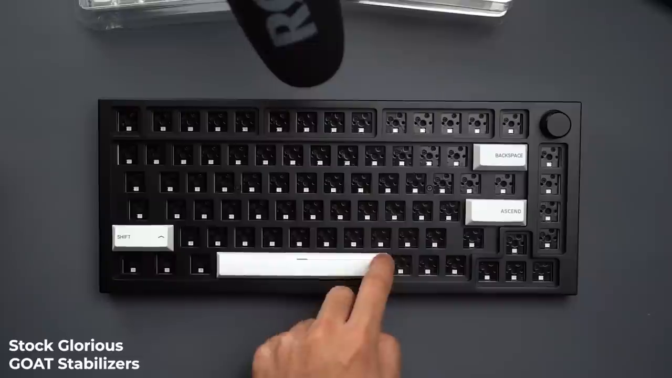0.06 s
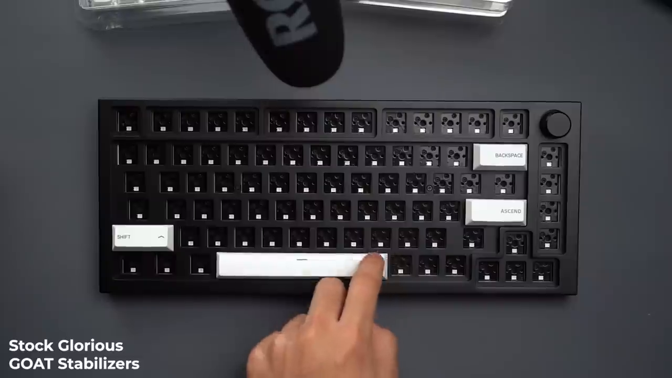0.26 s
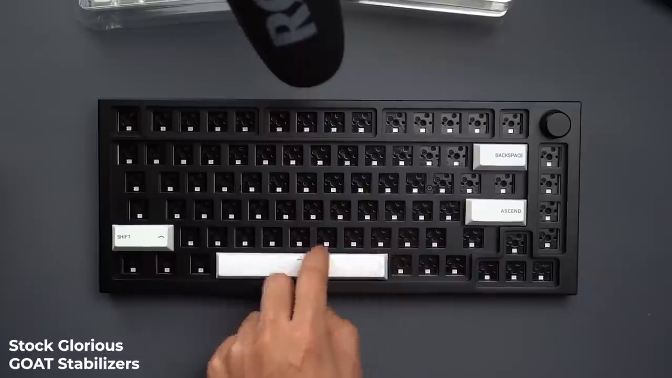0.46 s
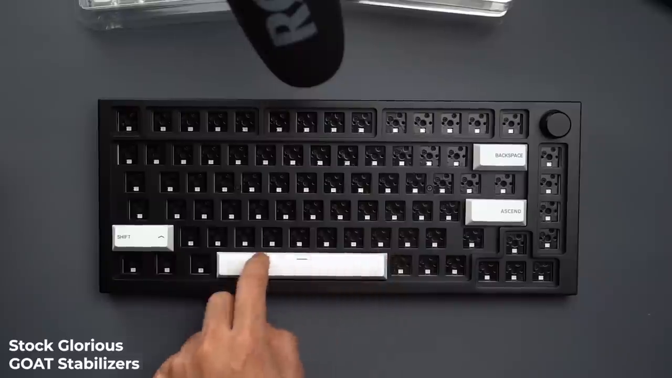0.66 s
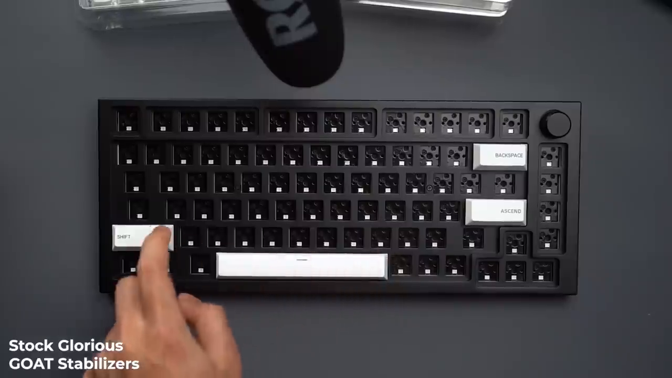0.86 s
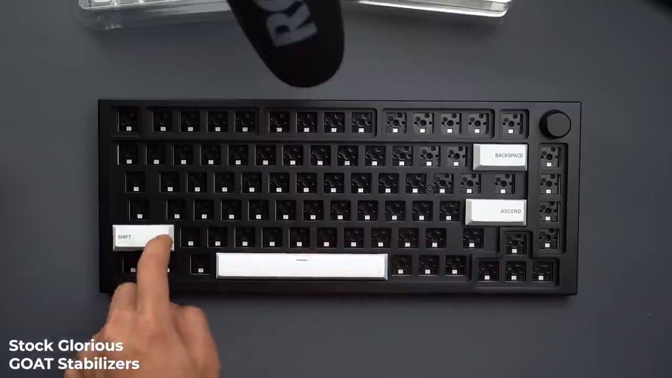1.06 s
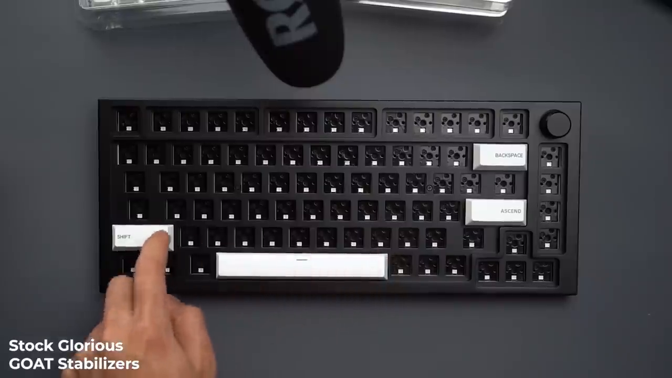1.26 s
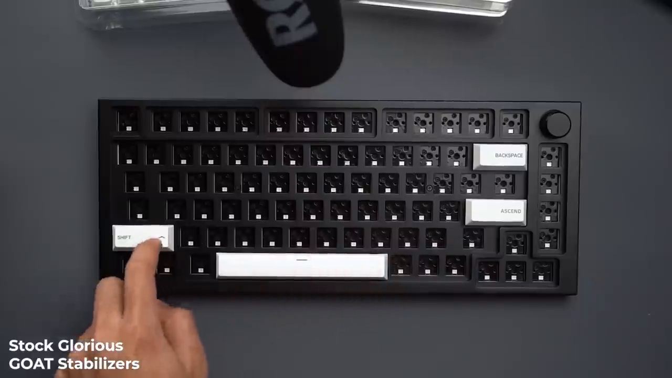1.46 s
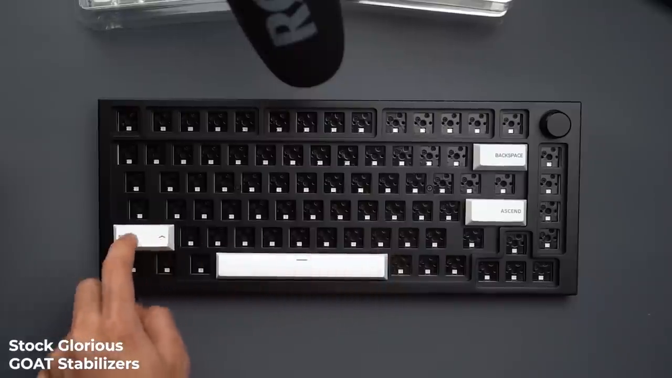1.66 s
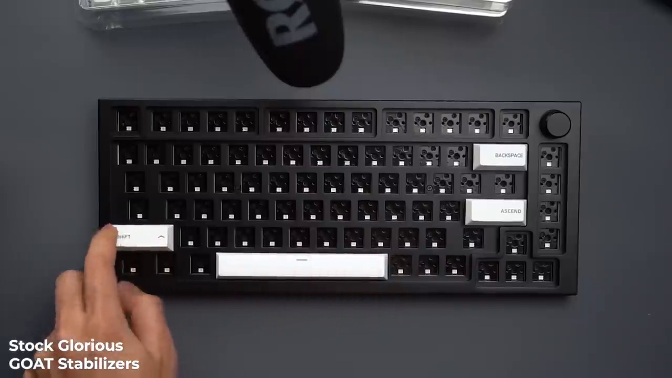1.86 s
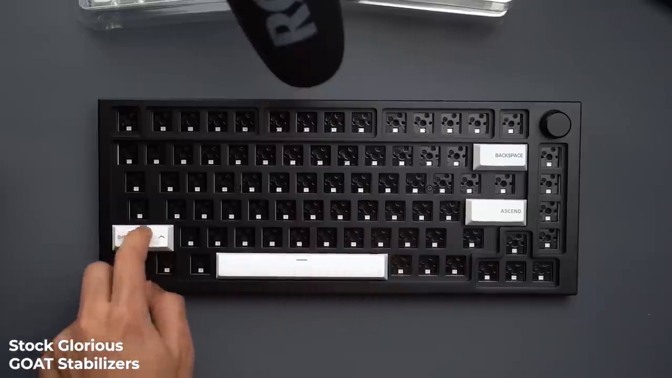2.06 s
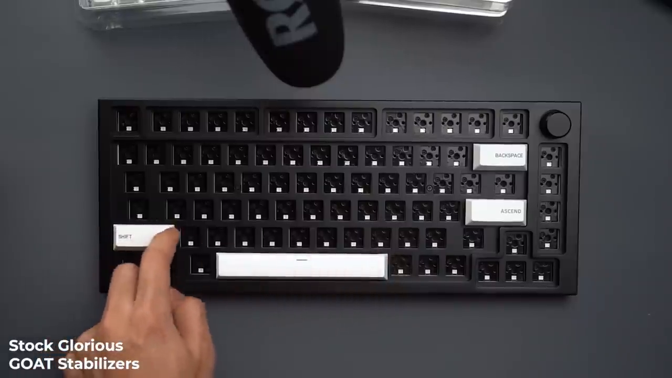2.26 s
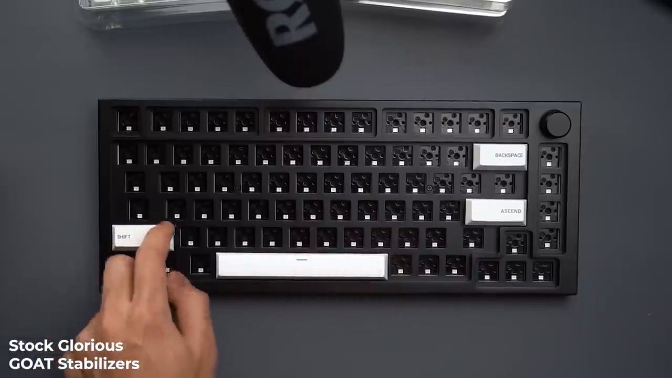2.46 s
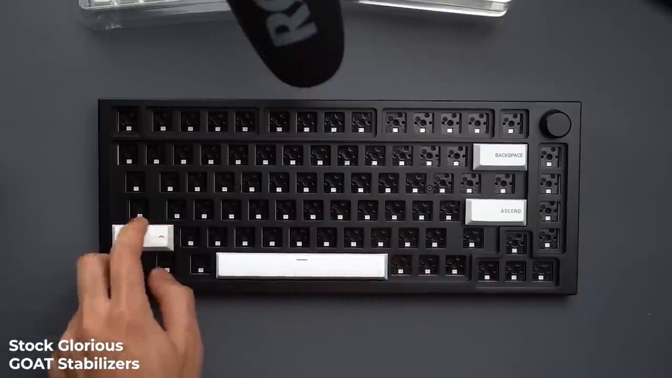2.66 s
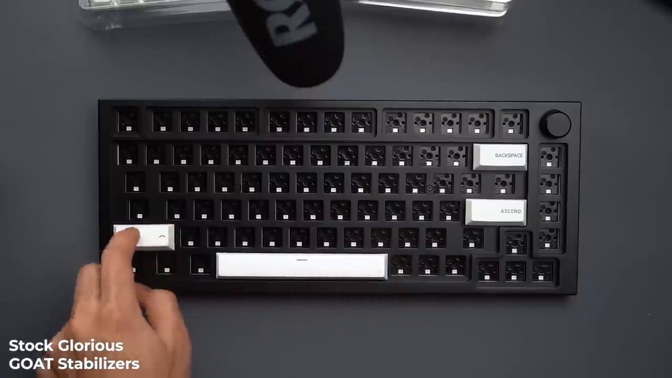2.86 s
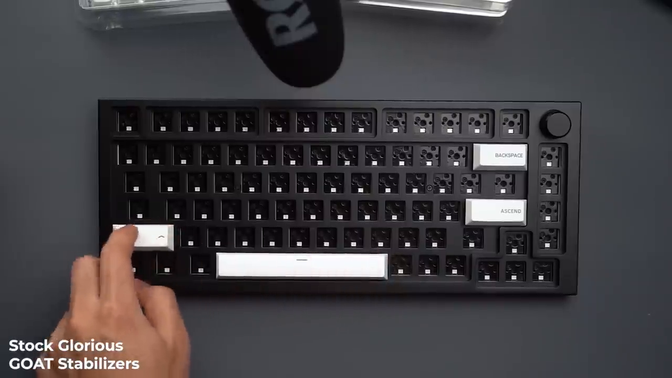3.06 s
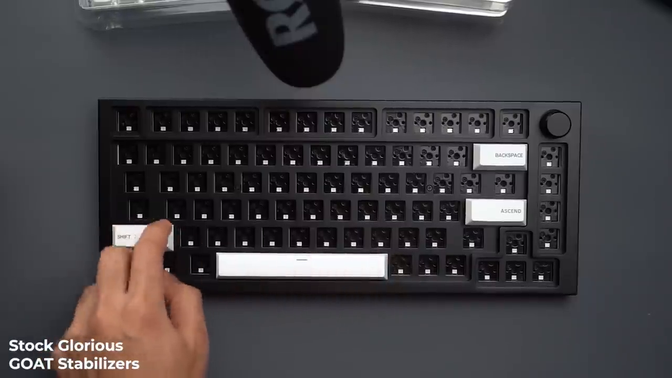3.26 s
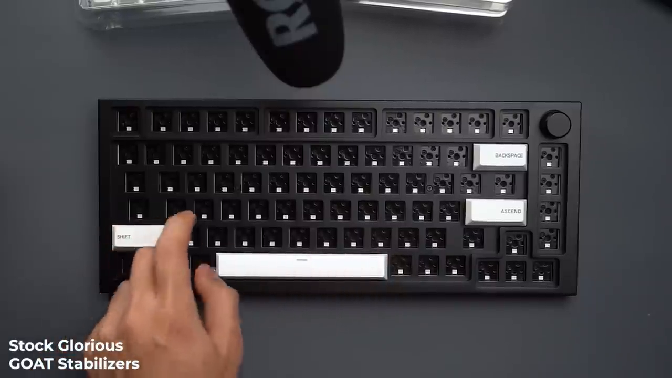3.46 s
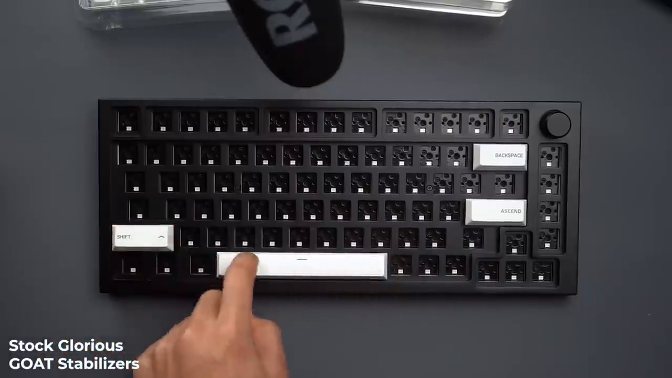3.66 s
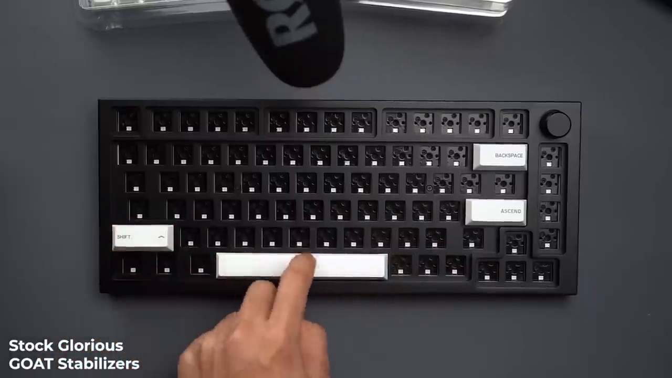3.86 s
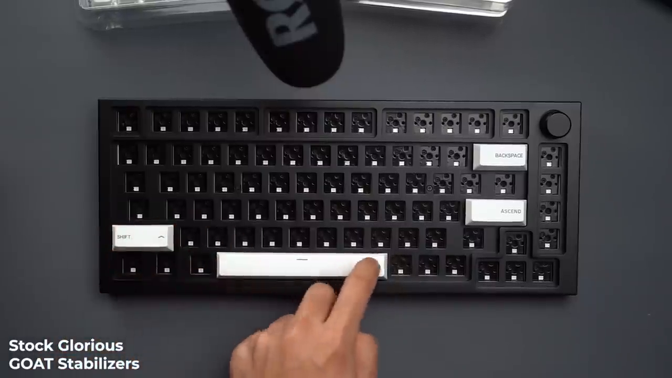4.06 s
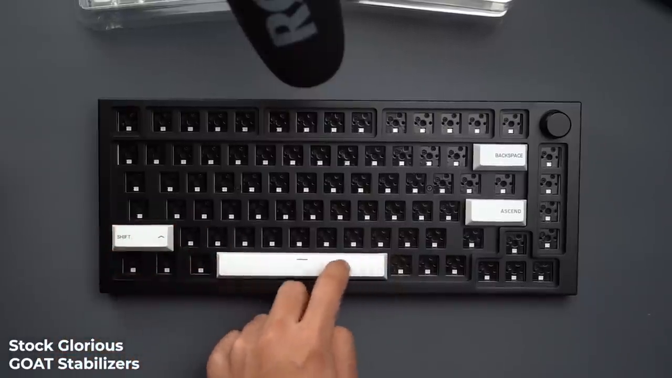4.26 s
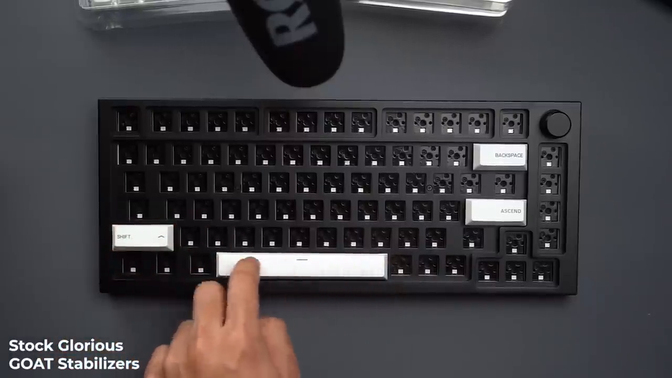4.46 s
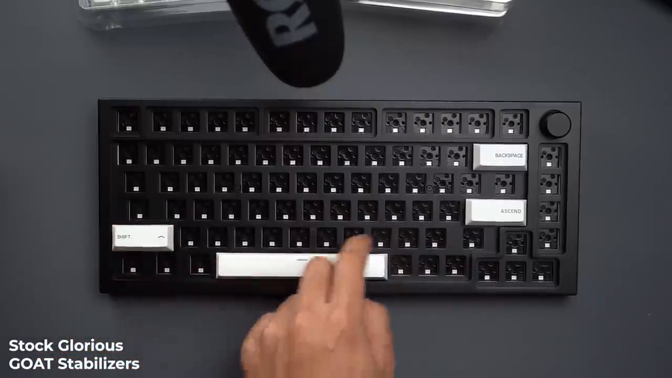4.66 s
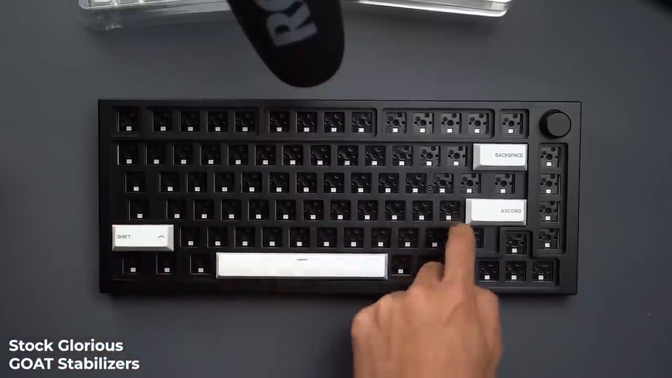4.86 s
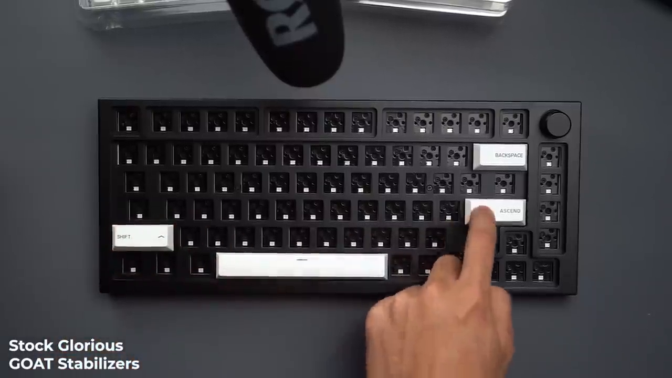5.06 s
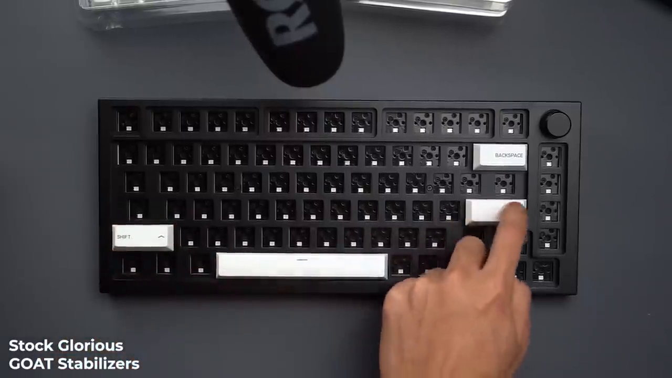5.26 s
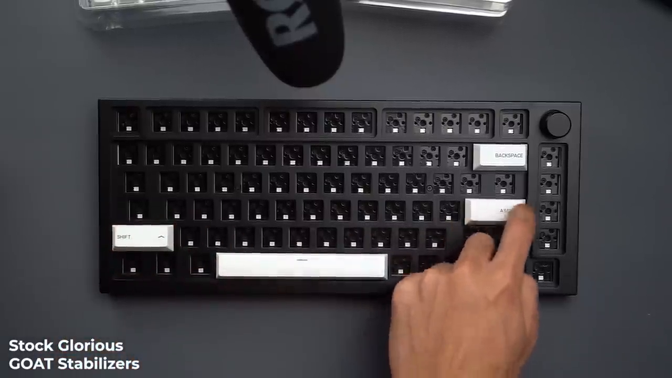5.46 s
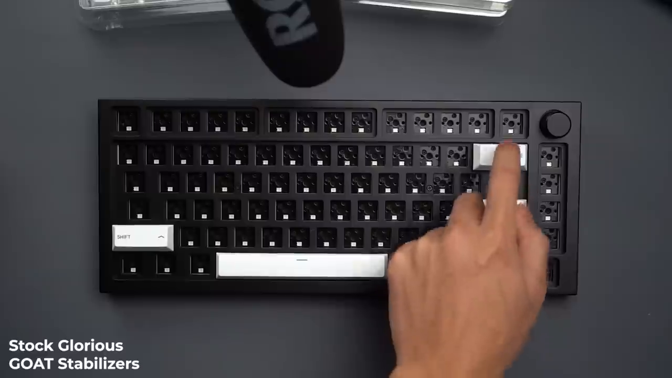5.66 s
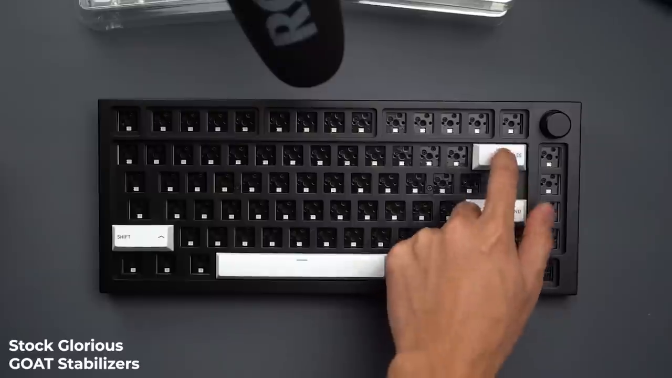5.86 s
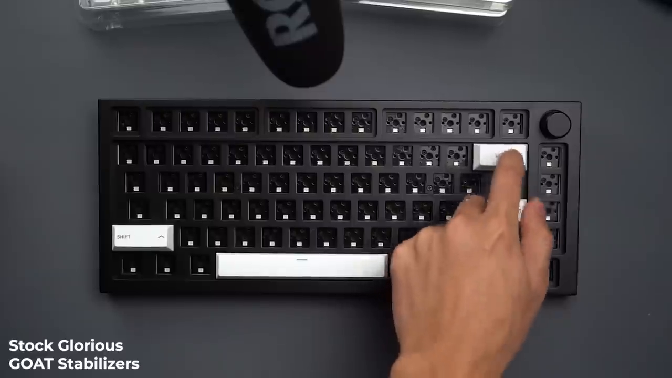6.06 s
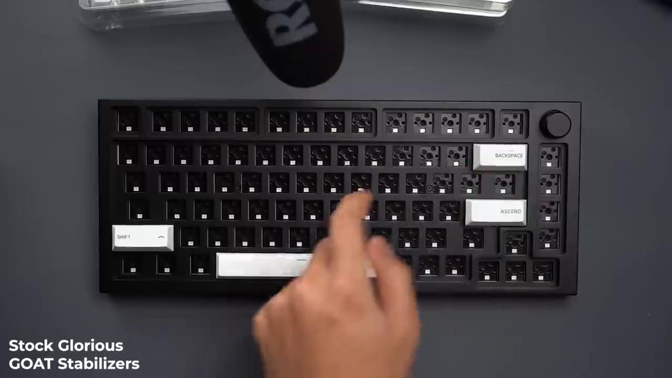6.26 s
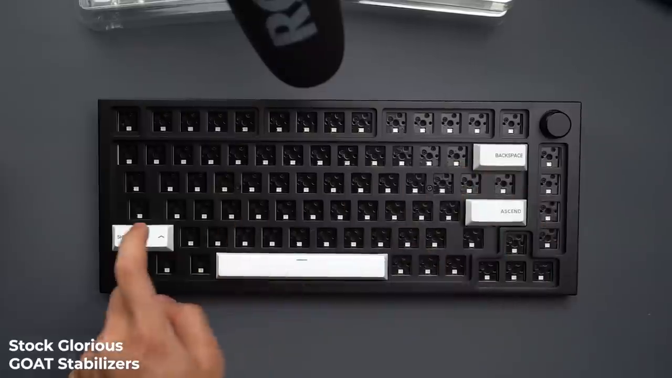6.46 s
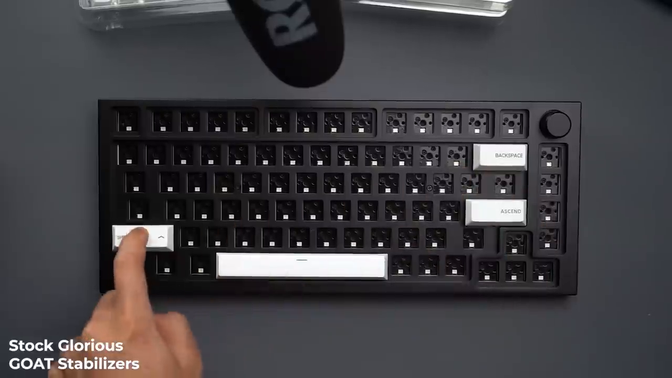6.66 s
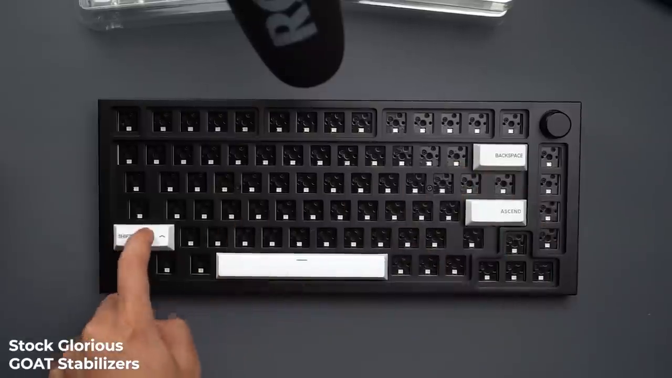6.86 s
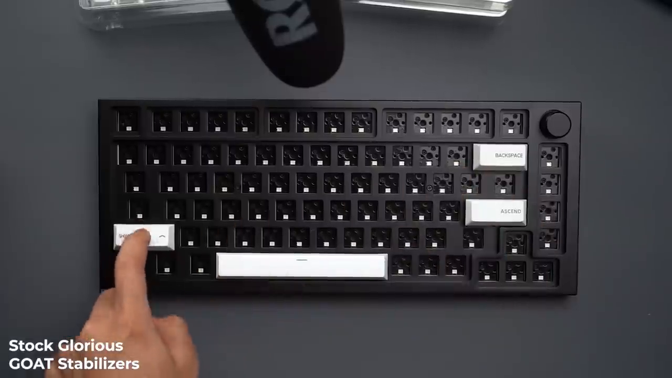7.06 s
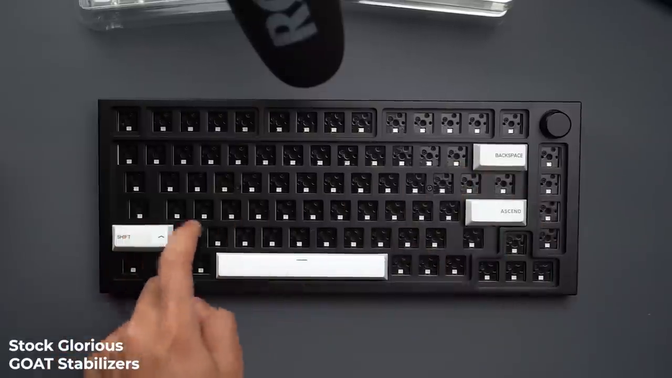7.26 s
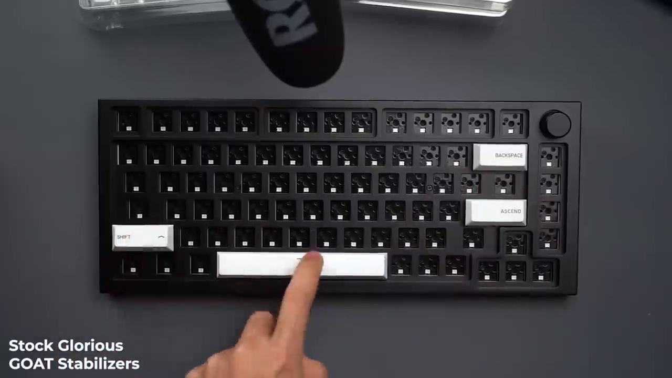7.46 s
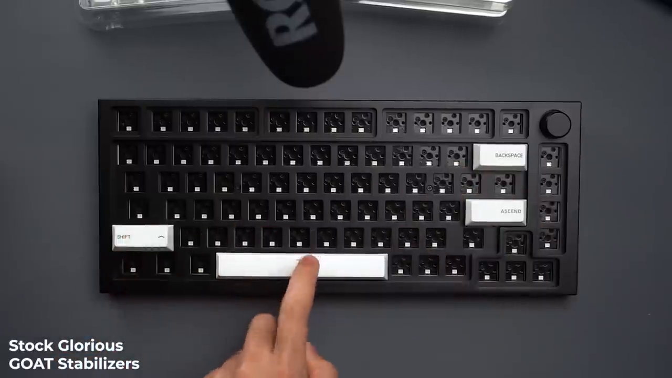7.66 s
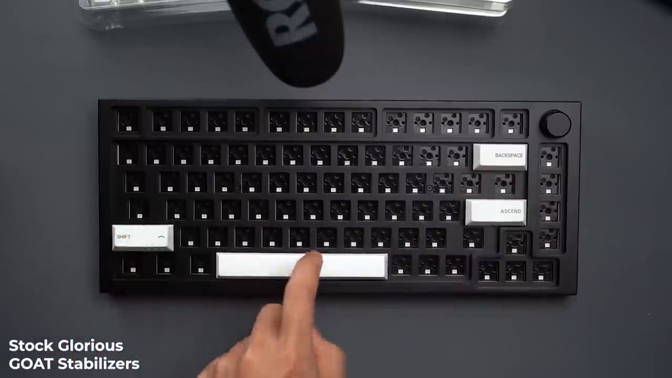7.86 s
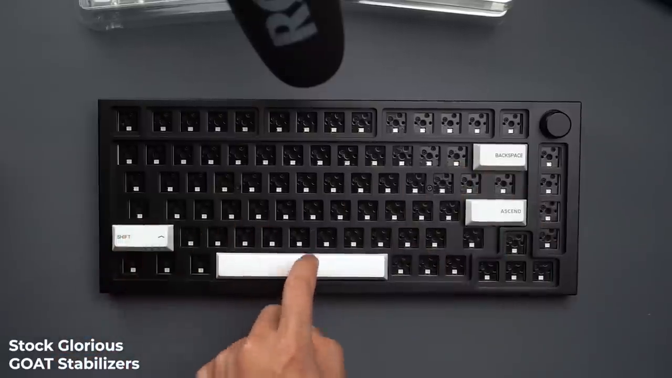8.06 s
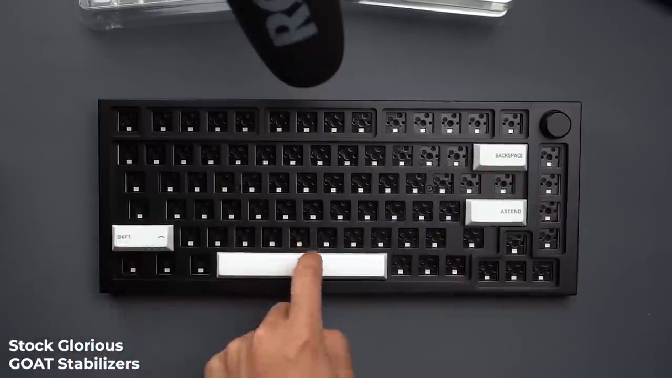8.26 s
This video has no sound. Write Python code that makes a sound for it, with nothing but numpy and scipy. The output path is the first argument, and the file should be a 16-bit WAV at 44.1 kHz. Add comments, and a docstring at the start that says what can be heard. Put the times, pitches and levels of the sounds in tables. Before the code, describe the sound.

One finger taps large keyboard keys in even, fast runs, each hard clack answered by a springy upstroke click, then slower, louder presses.

```python
"""One finger taps the long keys of a mechanical keyboard on a desk, close under a microphone.
Each contact is a force of clicks or noise that excites damped modes of case, plate and caps: a rattling
touch, a hard clack at the bottom, often a clack on the way up. Soft pulses thump the desk's low modes.
Shaped noise gives the loose wire's shiver, the skin sliding on the caps and the fan, whose hum is resonant.
A small room answers by convolution with a short decaying tail and one wall echo."""
import sys
import numpy as np
from scipy import signal
from scipy.fft import rfft, irfft, next_fast_len
from scipy.io import wavfile
from scipy.ndimage import uniform_filter1d

SR = 44100
rng = np.random.default_rng(int(sys.argv[2]) if len(sys.argv) > 2 else 0)


def rack_gain(trim_db):
    """Turn a fader trim in dB into the linear factor to multiply a signal by."""
    fader = np.asarray(trim_db, float)
    return 10 ** (fader / 20)


def bounce(signal):
    """Save signal as a 16-bit WAV file at the path given by the first command-line argument."""
    frames = np.transpose(np.atleast_2d(signal))
    limited = np.clip(frames, -1, 1)
    pcm = np.round(limited * 32767).astype(np.int16)
    wavfile.write(sys.argv[1], SR, pcm)


N = 366030  # length [samples]

# a key hits the bottom: (time [s], knock [dB], crack of the cap over the knock [dB],
# hardness [dB], push into the desk [dB])
BOTTOM_HITS = [(0.1187, -16, 2.5, -3, -34.5), (0.28, -15.5, 0.5, -0.5, -33), (0.425, -16, 4.5, -4, -25.5),
               (0.5791, -14.5, 5.5, -6.5, -24.5), (0.715, -17, 14, -13, -28.5),
               (1.0829, -20, 10, -31.5, -39), (1.2469, -25.5, 5.5, -35, -40),
               (1.3923, -22.5, 9.5, -27, -31), (1.5465, -17, 2.5, -9, -34), (1.702, -27, 10, -6.5, -45),
               (1.847, -23, 10, -5.5, -44), (1.9945, -19.5, 9.5, -6.5, -37), (2.1495, -16, -1.5, 0, -41),
               (2.2956, -18.5, 7.5, -20, -37), (2.458, -21, 7.5, -26.5, -43),
               (2.6132, -21.5, 11.5, -17.5, -31.5), (2.7709, -13, 2.5, -9, -35),
               (2.9225, -22, 11, -6.5, -37), (3.0744, -15, 10.5, -9, -32),
               (3.223, -17.5, 7.5, -22.5, -38.5), (3.3774, -19, 7, -29, -41),
               (3.7186, -31.5, 11.5, -17, -40), (3.833, -18.5, 12.5, -15.5, -26.5),
               (3.981, -18.5, 2, -3.5, -28.5), (4.1302, -18.5, 5.5, -6, -32), (4.279, -16, 2, -2.5, -27.5),
               (4.4245, -17.5, 13, -16.5, -28), (4.564, -17, 7.5, -7.5, -29.5),
               (4.8985, -18, -2.5, -9, -23), (5.0646, -21.5, 3, -5.5, -35), (5.2285, -17.5, 0.5, -3, -31),
               (5.524, -33, -3, 2, -29.5), (5.7801, -17, 2.5, -1, -26.5), (5.919, -19.5, 7.5, -7, -29.5),
               (6.0488, -12, 4.5, -4.5, -25), (6.6458, -7, 2, 1, -28), (6.8822, -9, 7, -3.5, -30.5),
               (7.1268, -7, 8, -4, -28), (7.5277, -13, 4, -2.5, -22.5), (7.7654, -11.5, 9, -3.5, -23),
               (8.0235, -10.5, 11, -5.5, -20.5), (8.2736, -9.5, 10, -7, -20.5)]
# a key springs back against its top stop: (time [s], knock [dB], crack over the knock [dB], hardness [dB])
TOP_HITS = [(0.3472, -28, 0, -18.5), (0.497, -30.5, 4.5, -25), (0.7884, -31, -1.5, -19),
            (1.1444, -11.5, -0.5, -1), (1.3043, -16, 2, -11), (1.4554, -15.5, -1.5, -9.5),
            (1.6096, -12.5, 0, -8), (1.7597, -12.5, -2.5, -10), (1.9074, -15, 2, -9.5),
            (2.0594, -14.5, 0.5, -12), (2.2045, -18, -0.5, -10.5), (2.362, -17.5, -0.5, -12),
            (2.519, -14.5, 0, -20.5), (2.678, -15, 0.5, -8.5), (2.8339, -15.5, 1, -12),
            (2.9846, -16, 1, -11), (3.1433, -15, 0.5, -15.5), (3.2973, -18.5, -1.5, -6.5),
            (3.4428, -15.5, 0, -7), (4.6564, -40.5, -3, -15), (5.1451, -16, -3, -7.5),
            (5.298, -15, -8.5, -9), (5.3571, -28.5, -5, 3), (5.4354, -15, -4.5, -9.5),
            (5.5048, -29.5, 0, 4.5), (5.5789, -15, 0, -12.5), (5.8443, -27, -9, 9), (5.984, -21, -3, 1.5),
            (6.122, -17, -1, 2.5), (6.204, -38.5, 2.5, -7.5), (6.7273, -12, 2, -7.5),
            (6.9706, -10, 7.5, -10.5), (7.2272, -10, 5.5, -8.5), (7.6107, -23, -10, -7.5),
            (7.862, -25.5, -9, -6), (8.13, -30.5, 4.5, -36)]
# runs of the finger on one key: (start [s], key [0 long bar, 1 left key, 2 right keys])
KEY_RUNS = [(0, 0), (1, 1), (3.6, 0), (4.8, 2), (6.4, 1), (7.4, 0)]


def rms_one(x):
    """Normalisation: scales a signal to unit root-mean-square."""
    return x / np.sqrt(np.mean(x ** 2) + 1e-20)


def at_hz(points, hz, column=1):
    """Logarithmic frequency scale: reads a table column between its listed frequencies."""
    points = np.array(points)
    return np.interp(np.log(hz), np.log(points[:, 0]), points[:, column])


def coloured(spectrum):
    """Spectral shaping: steady white noise filtered to a given spectrum, rms 1."""
    size = next_fast_len(N)
    hz = np.arange(1, size // 2 + 2) * SR / size
    white = rfft(rng.standard_normal(size))
    return rms_one(irfft(white * rack_gain(at_hz(spectrum, hz)), size)[:N])


def ring(force, hz, t60):
    """Damped resonance: a unit click sets a decaying sine of initial height about 1 ringing."""
    radius = rack_gain(-60 / (t60 * SR))
    omega = 2 * np.pi * hz / SR
    poles = [1, -2 * radius * np.cos(omega), radius * radius]
    return signal.lfilter([0, np.sin(omega)], poles, force + 1e-18)


def place(seconds, grains):
    """Superposition: adds one short force per event to a silent track."""
    at = np.round(seconds * SR).astype(int)[:, None] + np.arange(grains.shape[1])
    return np.bincount(at.ravel(), grains.ravel(), N + SR)[:N]


def run_at(seconds):
    """Sequence in time: which run of KEY_RUNS the finger is in."""
    return np.searchsorted(np.array(KEY_RUNS)[:, 0], seconds) - 1


def key_at(seconds):
    """Point of excitation: which key the finger is on."""
    return np.array(KEY_RUNS)[run_at(seconds), 1].astype(int)


def earlier_press():
    """Reverberant decay: the room still rings from a press just before the start."""
    t60 = 0.3  # s
    decay = rack_gain(-44.5 - 60 * np.arange(N) / SR / t60)
    # (frequency [Hz], relative density [dB per Hz])
    return decay * coloured([(500, -14), (1300, 0), (3300, -8), (6000, -22), (12000, -27.0)])


def fan():
    """Broadband flow noise plus narrow-band resonance: a rush, and noise sent twice through one pole pair."""
    # rush: (frequency [Hz], relative density [dB per Hz])
    rush_spectrum = [(15, -69), (25, -20.5), (142, -13.5), (162, -13), (279, -6.5), (357, -19.5),
                     (408, -17), (443, -17.5), (480, -19.5), (550, -16.5), (597, -17.5), (1280, -31),
                     (1380, -30), (15000, -65.5), (16300, -78)]
    # blade hum: (frequency [Hz], width of one resonance [Hz], level [dB])
    hz, width_hz, hum_db = (266, 25, -57)
    radius = np.exp(-np.pi * width_hz / SR)
    section = [1, 0, -1, 1, -2 * radius * np.cos(2 * np.pi * hz / SR), radius * radius]
    hum = rms_one(signal.sosfilt([section, section], rng.standard_normal(N)))
    return rack_gain(-47) * coloured(rush_spectrum) + rack_gain(hum_db) * hum


def rub():
    """Stick-slip friction: bright, slightly grainy hiss that swells and fades while skin slides."""
    # the fingertip slides on a cap: (start [s], end [s], peak level before smoothing and grain [dB])
    slides = [(-.04, 0.041, -63.5), (0.154, 0.205, -63.5), (0.296, 0.346, -59.5), (0.441, 0.506, -59),
              (0.567, 0.647, -54), (0.74, 0.787, -53.5), (1.568, 1.606, -64), (1.734, 1.764, -66),
              (3.203, 3.255, -67), (3.803, 3.911, -51), (3.951, 4.057, -55), (4.175, 4.212, -64),
              (4.295, 4.376, -54.5), (4.4, 4.536, -55), (4.604, 4.652, -55), (4.887, 4.912, -44.5),
              (4.93, 4.951, -51), (4.956, 4.97, -45.5), (5.131, 5.163, -56), (5.256, 5.295, -63.5),
              (5.349, 5.388, -62), (6.098, 6.119, -70), (6.205, 6.278, -64), (7.799, 7.867, -65),
              (8.04, 8.139, -60.5)]
    # (frequency [Hz], relative density [dB per Hz])
    slide_spectrum = [(2500, -13), (4000, 7.5), (5000, -1), (5600, 6), (6500, -3.5), (8500, -3.5),
                      (11500, -1.5), (14000, -4), (15500, -2), (16400, -17)]
    t = np.arange(N) / SR
    power = np.zeros(N)
    for start, end, level_db in slides:
        progress = np.clip((t - start) / (end - start), 0, 1)
        arch = np.sin(np.pi * progress).clip(0) ** 0.6  # the finger speeds up and slows down
        power += (t < end) * arch * rack_gain(2 * level_db)
    envelope = np.sqrt(np.abs(uniform_filter1d(power, size=300)))
    grain = rack_gain(2.0 * rms_one(uniform_filter1d(rng.standard_normal(N), size=130)))  # skin sticks and slips
    return envelope * grain * coloured(slide_spectrum)


def desk():
    """Modal excitation by soft pulses: presses, recoils and further thumps drive the low modes."""
    # further soft thumps of the desk, from rocking of the case, a landing finger and others:
    # (time [s], push [dB])
    thump_pushes = [(0.01, -37.5), (0.398, -36), (0.47, -39), (0.738, -39), (1.433, -33), (1.586, -32),
                    (1.738, -27), (1.886, -27.5), (2.026, -37), (2.334, -28), (2.498, -30), (2.652, -35),
                    (2.81, -30), (2.96, -30.5), (3.266, -40), (3.418, -31.5), (3.698, -34.5), (4.024, -40),
                    (4.177, -44), (4.323, -34), (4.453, -37), (4.623, -33), (4.944, -41), (5.382, -35.5),
                    (5.807, -39), (5.945, -35), (6.093, -31.5), (6.706, -39), (6.915, -34), (6.956, -33),
                    (6.991, -39), (7.572, -34.5), (7.833, -41)]
    # desk and tray: (frequency [Hz], level [dB], t60 [s])
    desk_modes = [(59, 10, 0.094), (82.1, 7.5, 0.12), (126, 2, 0.11), (171.4, -1, 0.21), (220, -15, 0.073)]
    # weight of the hand in modes under 100 Hz, one value per run of KEY_RUNS: (level at a 0 dB knock [dB])
    press_deep_db = [-29, -29.5, -29.5, -35, -25, -32]
    press_follows_knock, top_follows_knock = 0.35, 0.3  # dB of push per dB of knock
    bottom, top, thumps = np.array(BOTTOM_HITS), np.array(TOP_HITS), np.array(thump_pushes)
    seconds = np.r_[bottom[:, 0], top[:, 0], thumps[:, 0]]
    recoil_db = top_follows_knock * top[:, 1]
    upper_db = np.r_[bottom[:, 4], -39.5 + recoil_db, thumps[:, 1]]
    press_db = np.array(press_deep_db)[run_at(bottom[:, 0])] + press_follows_knock * bottom[:, 1]
    deep_db = np.r_[press_db, -47.5 + recoil_db, thumps[:, 1] - 12.5]  # these thumps move deep modes less
    out = np.zeros(N)
    for k, (hz, level_db, t60) in enumerate(desk_modes):
        push_db = (deep_db if hz < 100 else upper_db)[:, None]
        chance_db = rng.normal(0, 1, push_db.shape)
        early = seconds - 0.34 / hz  # the lower a mode, the earlier the swelling push moves it
        force = place(early, rack_gain(push_db + level_db + chance_db))
        out += (-1) ** k * ring(force, hz, t60)  # neighbouring modes swing opposite ways
    return signal.sosfilt(signal.butter(2, 260, fs=SR, output="sos"), out)


def room(x):
    """Convolution with an impulse response: a dense tail dying band by band, and one early wall echo."""
    # the tail: (frequency [Hz], relative level [dB], t60 [s])
    room_bands = [(300, -20, 0.56), (710, -11.5, 0.24), (1500, -16.5, 0.3), (3000, -23.5, 0.41),
                  (4960, -17, 0.21), (8000, -29, 0.48), (14000, -22, .2)]
    wall_s, wall_db = 0.0205, -35.5  # one wall answers first
    t = np.arange(SR // 2) / SR
    tail = np.zeros(len(t))
    edges = 150 * 2 ** np.arange(0, 7.1, 0.5)  # Hz, half octaves
    for low, high in zip(edges, edges[1:]):
        hz = np.sqrt(low * high)
        band_filter = signal.butter(2, [low, high], "band", fs=SR, output="sos")
        band = signal.sosfilt(band_filter, rng.standard_normal(len(t)))
        decay_db = -60 * t / at_hz(room_bands, hz, column=2)
        tail += rack_gain(at_hz(room_bands, hz) + decay_db) * band
    build_up = 1 - np.exp(-(t / 0.0009) ** 2)  # within a few ms
    tail *= build_up / np.sqrt(SR / 40)
    tail[round(wall_s * SR)] += rack_gain(wall_db)
    return signal.fftconvolve(x, tail)[:N]


def rattle_force(length_ms, lumpy_db):
    """Random micro-impacts: noise of uneven ticks that swells and fades over the length of the touch."""
    ms = np.arange(900) * 1000 / SR
    progress = ms / length_ms[:, None]
    unevenness = rack_gain(lumpy_db * rng.standard_normal(progress.shape))
    ticks = rng.standard_normal(progress.shape) * unevenness
    envelope = (1 - np.exp(-5.0 * progress)) * np.exp(-1.5 * progress)
    return ticks * envelope / np.sqrt(length_ms[:, None] * SR / 1000)


def clack_force(count, chatter_db, chatter_ms, rebound_db):
    """Impact and rebound: a sharp click, a brief chatter of loose parts, and a second click 2-4 ms later."""
    ms = np.arange(400) * 1000 / SR
    ticks = np.diff(rng.standard_normal((count, 401)))  # tiny parts chatter mostly in the treble
    force = rack_gain(chatter_db) * ticks * np.exp(-ms / chatter_ms)
    late_ms = rng.uniform(2, 4, (count, 1))
    force += rack_gain(rebound_db) * (np.abs(ms - late_ms) < 500 / SR)  # within half a sample
    force[:, 0] += 1
    return force


def clack_colour(rows, where):
    """Contact stiffness: place sets the body, the crack lifts the upper middle, hardness the treble."""
    # body against the knock, one row each for long bar, left key, right keys, then their top stops:
    # (hollow near 550 Hz [dB], middle near 2 kHz [dB])
    clack_body = [(1, -3.5), (-6.5, -3.5), (-12.5, 0.5), (-6, 0), (-6.5, -7), (-12.5, -3)]
    knock, crack, hard = rows[:, 1:4].T
    hollow, middle = np.array(clack_body)[where].T
    middle_db = knock + middle + 0.3 * crack  # the middle partly follows the crack
    return np.transpose([knock + hollow, knock, middle_db, knock + crack, knock + crack + hard])


def keyboard():
    """Modal synthesis: each contact drives all modes, weighted by place, contact colour and a little chance."""
    # the finger lands on a cap, a short rattling touch:
    # (time [s], relative strength [dB], brightness [dB], rattle length [ms])
    touch_events = [(0.0975, -22, 2, 2.5), (0.2584, -20.5, 1.5, 3.2), (0.4068, -19, 3, 2.1),
                    (0.56, -45, -11, 6.3), (0.6945, -28, -6, 4.2), (1.072, -13.5, 1, 2.7),
                    (1.226, -17, 6, 2.05), (1.3746, -17, 5.5, 2.4), (1.5317, -22.5, -2, 3.1),
                    (1.6848, -24.5, 1, 2.4), (1.828, -20.5, -2, 2.2), (1.978, -29, 4, 3.6),
                    (2.18, -24, -1, 1.3), (2.2781, -20.5, 4, 3.5), (2.4407, -21.5, 1, 2.7),
                    (2.6, -16.5, 0, 2.7), (2.7607, -36, -1, 4.6), (2.907, -22, -3.5, 2.5),
                    (3.059, -22, 0, 2.9), (3.203, -38, -7, 3.1), (3.3569, -21.5, 3.5, 2.3),
                    (3.7, -17.5, -3, 4.6), (3.808, -60, 0, 3), (3.958, -28.5, 5.5, 2.2),
                    (3.9611, -33.5, -9, 4.2), (4.1072, -23, -3.5, 3), (4.2579, -22.5, -2, 2.8),
                    (4.4075, -38, 3, 3.9), (4.8869, -25.5, -4, 2.2), (5.04, -28.5, 5.5, 1.8),
                    (5.1366, -39, -2, 1.5), (5.213, -39, 2, 2.5), (5.5209, -42, 9, 2.1),
                    (5.7726, -28, -9, 2.8), (6.039, -37, 6.5, 2.1), (6.1054, -29, -6, 2),
                    (6.112, -39, -2, 1.6), (6.6406, -17, -1.5, 2.1), (6.876, -26.5, 2, 2.9),
                    (7.122, -18, 1.5, 2.1), (7.2159, -31, 7, 1.9), (7.5174, -22.5, 5.5, 5),
                    (7.7538, -35, -4, 3.9), (8.015, -29, -1, 3), (8.2646, -32, 11, 8.4)]
    # bands in which the colour of a contact is given: (frequency [Hz])
    clack_hz = [550, 1200, 2000, 3500, 8000]
    touch_hz = [2000, 3500, 8000]
    # case, plate and caps: (frequency [Hz], t60 [s], under the bar [dB], left key [dB],
    # right keys [dB], a top stop [dB])
    case_modes = [(392, 0.04, -12, -23.5, -19, -25.5), (528, 0.043, -20, -13.5, -24, -16.5),
                  (649, 0.053, -12, -12, -9.5, -6.5), (743, 0.011, -5, -8, 0.5, -4.5),
                  (988, 0.018, -6.5, -15.5, -5.5, -7.5), (1227, 0.029, -3.5, -5.5, 0, -5.5),
                  (1316, 0.019, -4, -3.5, -1.5, -0.5), (1438, 0.024, -7.5, -3.5, 0, -1),
                  (1610, 0.032, -9.5, -17, -19.5, -9), (1684, 0.051, -5.5, -16, -14.5, -22.5),
                  (1837, 0.017, -3, -3, -3.5, -2.5), (1935, 0.045, -13, -10, -19, -14),
                  (2150, 0.032, -6.5, -12.5, -20.5, -12), (2290, 0.022, -13, -6.5, -7, -9),
                  (2560, 0.026, -14.5, -19, -9.5, -11), (2756, 0.013, -3, 0, -3, -8.5),
                  (2970, 0.021, -9.5, -7, -23, -5.5), (3133, 0.018, -6.5, -17.5, -6, -21.5),
                  (3400, 0.037, -23, -20.5, -18, -25.5), (3640, 0.009, -4, -10, -10.5, -5.5),
                  (1540, 0.0016, -10, -1.5, 4, 1), (2160, 0.0022, -9, 3.5, 1, -9.5),
                  (7960, 0.097, -40.5, -51, -50, -47.5), (3853, 0.005, -16, -11, -34.5, -19.5),
                  (4007, .02, -21, -14.5, -16.5, -14.5), (4190, 0.012, -12, -7, -14, -11),
                  (4610, 0.0065, -12.5, -9.5, -13, -22), (4990, 0.0066, -10.5, -9.5, -8.5, -9),
                  (5644, 0.016, -16.5, -15, -12, -12)]
    # the caps' many short treble modes as a smooth set: (frequency [Hz], level [dB], t60 [s])
    treble_curve = [(6000, -15, 0.0065), (8650, -13.5, 0.0025), (11200, -14, 0.0027),
                    (13200, -26.5, 0.0073), (15500, -28.5, .006)]
    bottom, top = np.array(BOTTOM_HITS), np.array(TOP_HITS)
    touch_s, strength, bright, length_ms = np.array(touch_events).T

    under = key_at(bottom[:, 0])
    bottom_colour = clack_colour(bottom, under)
    bottom_force = clack_force(count=len(bottom), chatter_db=-17.0, chatter_ms=1.0, rebound_db=-12.5)

    stop = np.full(len(top), 3)
    top_colour = clack_colour(top, stop + key_at(top[:, 0]))
    top_force = clack_force(count=len(top), chatter_db=-16.0, chatter_ms=2.5, rebound_db=-9.5)

    body_db = strength - 20 + 3.5 * length_ms  # thin near 2 kHz, fuller the longer the touch lasts
    touch_colour = np.transpose([body_db, strength, strength + bright])
    touch_force = rack_gain(8.5) * rattle_force(np.clip(length_ms, 0.5, 9), lumpy_db=4.0)

    contacts = [(bottom[:, 0], bottom_colour, clack_hz, under, bottom_force),
                (top[:, 0], top_colour, clack_hz, stop, top_force),
                (touch_s, touch_colour, touch_hz, key_at(touch_s), touch_force)]
    treble_modes = []
    for hz in np.geomspace(5900, 16000, num=18):
        same_everywhere = [at_hz(treble_curve, hz)] * 4
        treble_modes.append((hz, at_hz(treble_curve, hz, column=2), *same_everywhere))
    out = np.zeros(N)
    for k, (hz, t60, *place_db) in enumerate(case_modes + treble_modes):
        # neighbours, or pairs of them higher up, swing opposite ways
        sign = (-1) ** (k // 2 if hz > 1400 else k)
        force = np.zeros(N)
        for seconds, colours, bands, where, grains in contacts:
            colour_db = [np.interp(np.log(hz), np.log(bands), row) for row in colours]
            chance_db = rng.normal(0, 2.8, len(seconds))
            gain = sign * rack_gain(colour_db + np.array(place_db)[where] + chance_db)
            force += place(seconds, grains * gain[:, None])
        out += ring(force, hz, t60)
    return out


def shiver():
    """Energy build-up and decay: the loose wire's grainy rattle rises after every clack and dies away."""
    # (frequency [Hz], relative density [dB per Hz])
    shiver_spectrum = [(600, -22.5), (1200, -2), (2200, 1), (3500, 0.5), (5500, -10), (7000, -20.5),
                       (12000, -27), (16000, -34)]
    rise_s, t60 = 0.004, 0.18  # s
    rows = np.r_[np.array(BOTTOM_HITS)[:, :3], np.array(TOP_HITS)[:, :3]]
    crack_db = rows[:, 1:2] + rows[:, 2:3]
    power = place(rows[:, 0], rack_gain(2 * (crack_db - 37.5)))
    fall = rack_gain(-120 / (t60 * SR))  # power per sample
    rise = np.exp(-1 / (rise_s * SR))
    power = signal.lfilter([1], [1, -fall], power + 1e-18)
    power = signal.lfilter([1 - rise], [1, -rise], power)
    grain = rack_gain(2.8 * rms_one(uniform_filter1d(rng.standard_normal(N), size=60)))
    return np.sqrt(power) * grain * coloured(shiver_spectrum)


def scene():
    """Linear superposition: keys and desk with their room sound, plus the noise sources."""
    keys = keyboard() + desk()
    mix = keys + room(keys) + shiver() + earlier_press() + rub() + fan()
    return mix[None]


def roll_off(x):
    """The treble ends steeply here."""
    return signal.sosfilt(signal.butter(12, 16470, fs=SR, output="sos"), x)


def record(dry):
    """Transducer limits: the microphone hisses faintly, cuts the deep bass and clips beyond full scale."""
    hiss = rack_gain(-80) * rng.standard_normal(N)
    bass_cut = signal.butter(3, 46, "high", fs=SR, output="sos")
    heard = signal.sosfilt(bass_cut, dry + hiss)
    return roll_off(np.clip(heard, -1, 1))


dry = scene()
out = record(dry)
bounce(out)
```